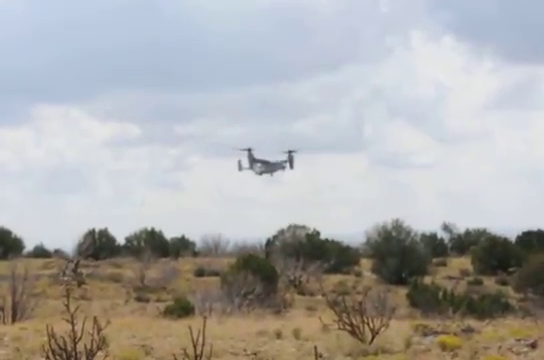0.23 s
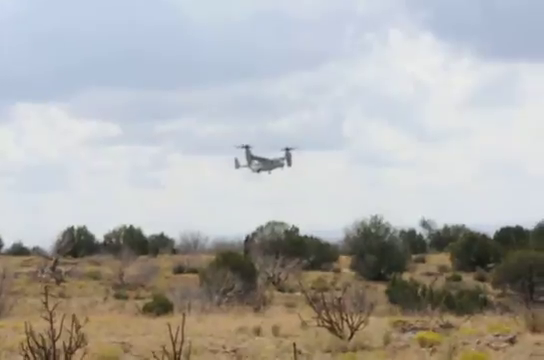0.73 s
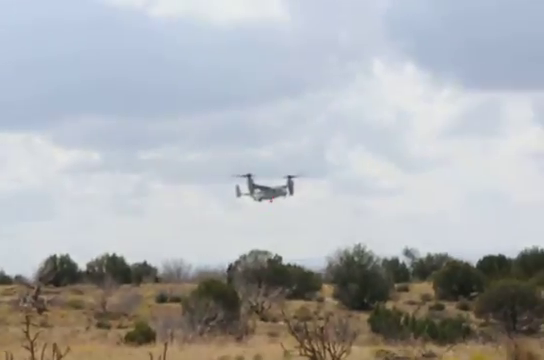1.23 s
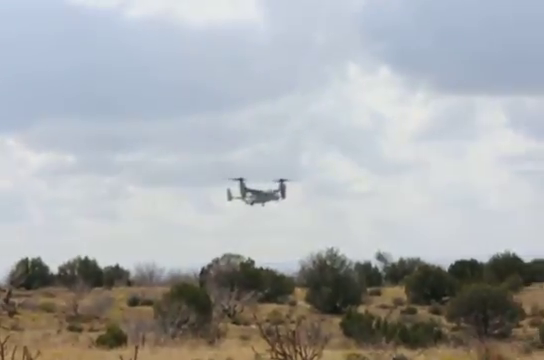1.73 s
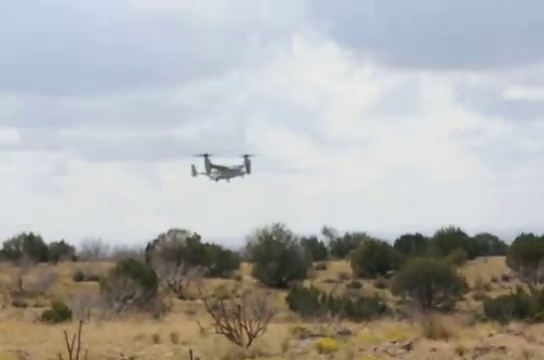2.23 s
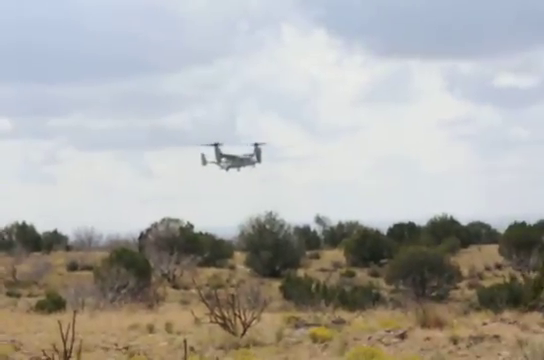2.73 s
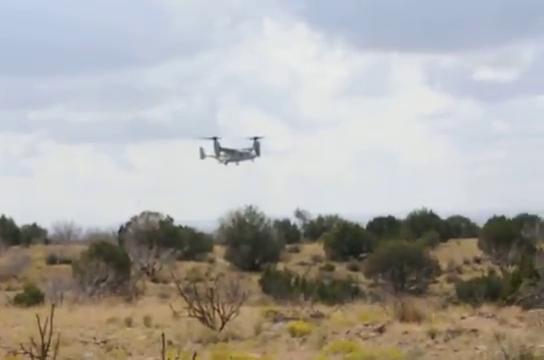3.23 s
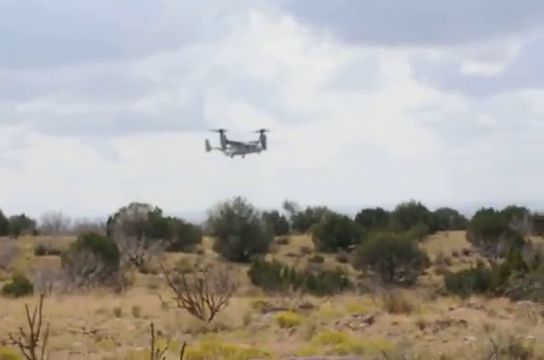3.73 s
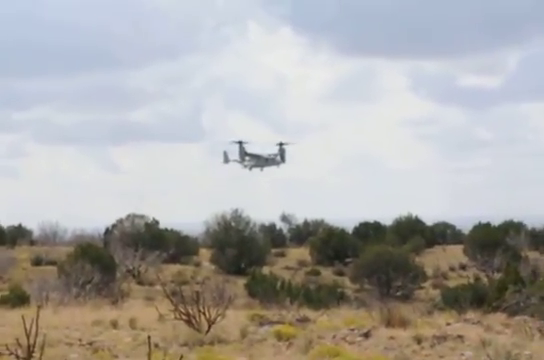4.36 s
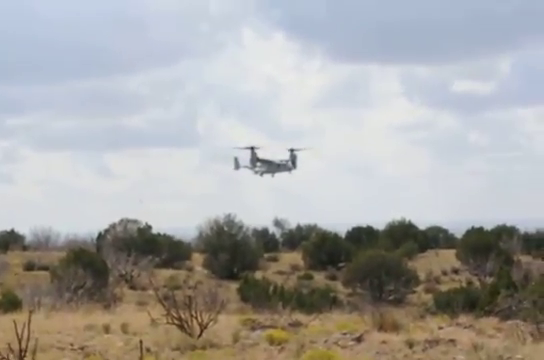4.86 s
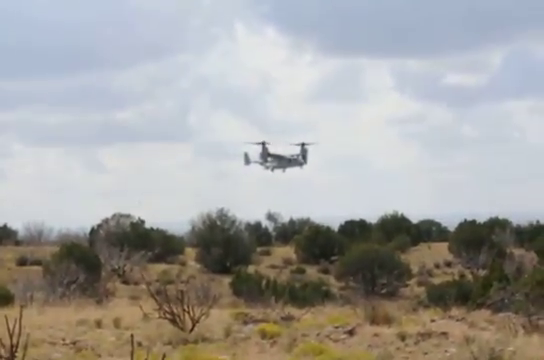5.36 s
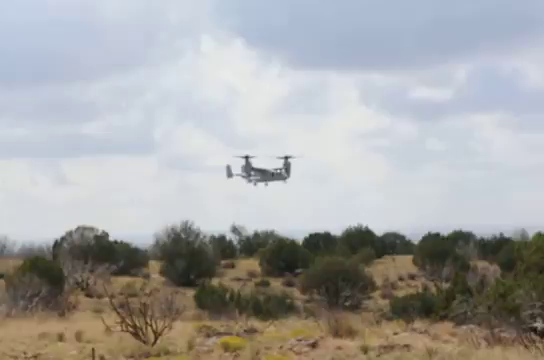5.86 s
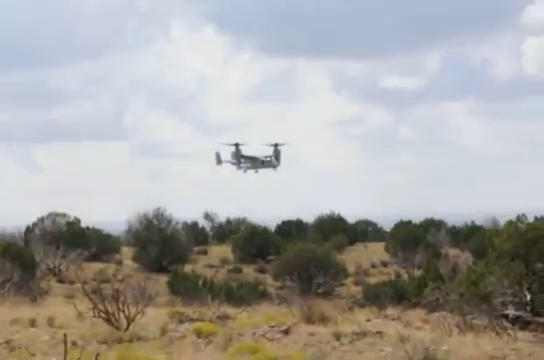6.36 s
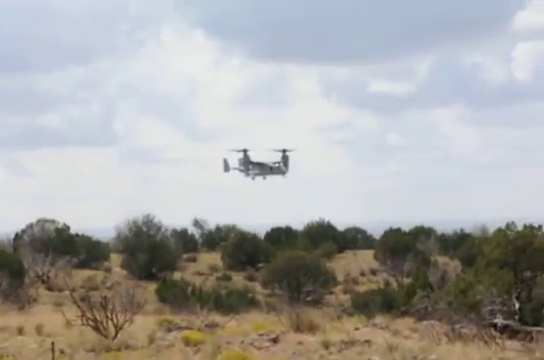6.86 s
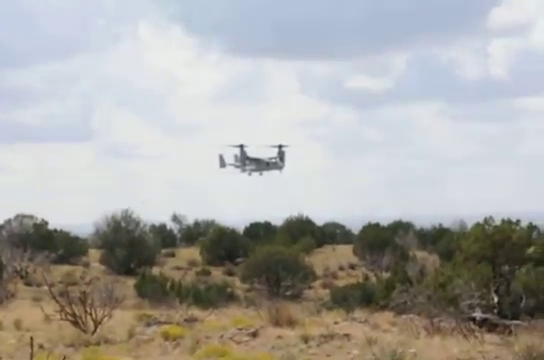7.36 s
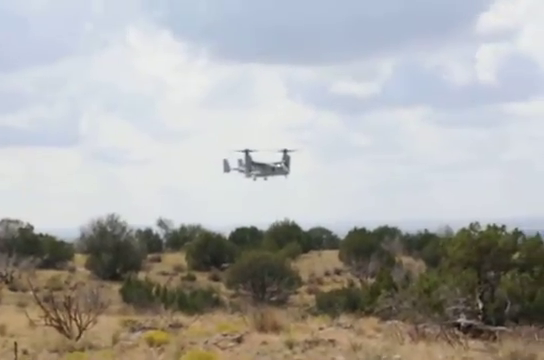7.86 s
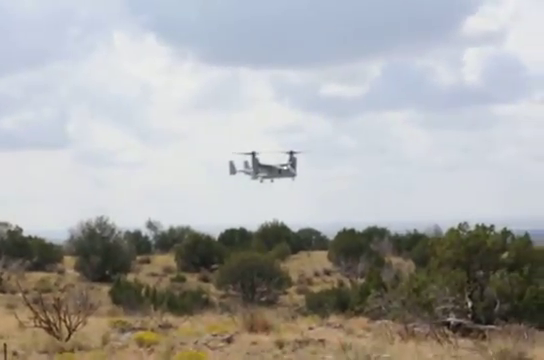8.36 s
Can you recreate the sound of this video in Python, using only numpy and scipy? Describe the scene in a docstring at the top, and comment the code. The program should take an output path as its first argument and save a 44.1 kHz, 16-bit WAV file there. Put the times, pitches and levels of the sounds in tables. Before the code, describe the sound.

Outdoors over open scrubland, a twin-rotor aircraft hovers low. Its blades chop at about twenty-one beats a second without pause, each beat a low thump with a sharp slap. Early slaps crack hard, then soften, and heavy thumps return later. Turbine roar and hiss run beneath. Gusty wind buffets a small microphone, strongest at start and end, and the loudest peaks clip.

```python
"""A twin-rotor aircraft hovers low over scrubland, with one small microphone in gusty wind and rotor wash.
Turbine roar and wind buffeting run throughout; each blade pass sends a suction thump and a sharp vortex slap.
From about 0.6 to 1.9 s the slaps are hard and the thumps weaken; after 2 s the slaps mostly soften.
From about 5 s heavy thumps return, and the wind swells again near the end. Slaps carry knock, crackle and a
scattered tail, some a sliding tone. The input clips the loudest peaks."""
import sys
import numpy as np
from scipy import signal
from scipy.fft import rfft, irfft, next_fast_len
from scipy.io import wavfile
from scipy.ndimage import uniform_filter1d, map_coordinates

SR = 44100
rng = np.random.default_rng(int(sys.argv[2]) if len(sys.argv) > 2 else 0)


def ratio(d):
    """dB to gain"""
    e = np.asarray(d, float) / 20
    return 10 ** e


def dump_mix(stems):
    """Bounce the given channels to the path in sys.argv[1] as a 16-bit WAV at rate SR."""
    frames = np.atleast_2d(stems).T  # one column per channel
    limited = np.clip(frames, -1, 1)  # hard clip at full scale
    pcm = np.round(limited * 32767).astype(np.int16)
    wavfile.write(sys.argv[1], SR, pcm)


N = 379260  # samples, 8.6 s
PASS_S = 0.008  # a pulse level is its rms over this time


def unit(x):
    """Scaled to rms 1."""
    return x / np.sqrt(np.mean(x ** 2) + 1e-20)


def curves(rows, at):
    """Each column after the time, read at the given times."""
    s, *columns = np.transpose(rows)
    return [np.interp(at, s, column) for column in columns]


def wobble(rate):
    """A smooth random curve, rate knots a second."""
    return map_coordinates(rng.standard_normal(N // 64), [np.arange(N) * rate / SR])


def coloured(x, spectrum, causal=False):
    """x through a (f/Hz, dB) spectrum that keeps the power of white noise; causal rings only after a blow."""
    m = 2 * next_fast_len(N // 2 + 4096)
    hz, db = np.transpose(spectrum)
    bins_hz = np.fft.rfftfreq(m, 1 / SR)
    gain = unit(ratio(np.interp(np.log(bins_hz + 1), np.log(hz), db, left=-120, right=-120)))
    if causal:
        # folding the cepstrum gives minimum phase
        cepstrum = irfft(np.log(gain + 1e-3), m)
        cepstrum[1:m // 2] *= 2
        gain = np.exp(rfft(cepstrum[:m // 2], m))
    return irfft(rfft(x, m) * gain, m)[:N]


def rush(spectrum, patchy_db):
    """Turbulent noise of rms 1 whose gain varies in random patches of time and frequency."""
    z = signal.stft(rng.standard_normal(N + 512), nperseg=512)[2]
    field = uniform_filter1d(rng.standard_normal(z.shape), size=5, axis=0)
    field = uniform_filter1d(field, size=10, axis=1)
    patchy = signal.istft(z * ratio(patchy_db * unit(field)), nperseg=512)[1][:N]
    return unit(coloured(patchy, spectrum))


def train(times, db, shape):
    """One pulse shape(ms from its centre) per time, each holding the energy of db over PASS_S."""
    index = np.round(times * SR).astype(int)[:, None] + np.arange(-512, 1024)
    pulses = shape((index / SR - times[:, None]) * 1000)
    energy = np.sum(pulses ** 2, axis=1, keepdims=True)
    pulses = pulses * np.sqrt(PASS_S * SR / energy) * ratio(db)[:, None]
    inside = (index >= 0) & (index < N)
    return np.bincount(index[inside], pulses[inside], N)


def suction(ms, width, shoulder, lean=0):
    """A pressure dip between two small rises; lean lifts the first and lowers the second."""
    u = (ms / width) ** 2
    return (shoulder * u - 1 - lean * ms / width) * np.exp(-u / 2)


def burst(ms, rise, decay, spike, fresh, count=5):
    """A downward spike in fast-dying noise, partly fresh, partly shared among count neighbouring passes."""
    envelope = np.exp(np.minimum(ms / rise, -ms / decay))
    lasting = unit(uniform_filter1d(rng.standard_normal(ms.shape), size=count, axis=0))
    noise = lasting + fresh * rng.standard_normal(ms.shape)
    return envelope * noise - spike * (np.abs(ms) < 0.02)


def eddy_pops(blow_db):
    """Single eddies strike the microphone at random, each a brief pressure dip that grows with the wind."""
    gap, size, wide = rng.random((800, 3)).T
    at = np.cumsum(-np.log(1 - gap)) / 70  # 70 a second on average
    pop_db = -31 + 1.5 * (np.interp(at, np.arange(N) / SR, blow_db) + 33) - 14 * size
    return train(at, pop_db, lambda ms: suction(ms, 0.55 * (0.69 + wide[:, None]), shoulder=0.91))


def wind():
    """Eddies hit the microphone in lumps; the harder it blows, the brighter the buffeting."""
    # steady part of the buffeting at the microphone: t/s, level/dB
    steady = [(0, -28.5), (.7, -40), (1.4, -34), (1.9, -33.5), (2.1, -42.5), (3.1, -40), (3.9, -43),
              (4.6, -34.5), (5.6, -34.5), (6.3, -35), (7.3, -34), (8.1, -32), (8.6, -27.5)]
    # gusts on top of it: t/s, half length/s, extra level/dB
    gusts = [(0.39, 0.16, 11.5), (0.969, 0.16, 10), (1.162, 0.015, 7), (1.667, 0.17, 6), (2.688, 0.043, 7),
             (3.595, 0.11, 7), (4.08, 0.097, 4), (5.02, 0.094, 8), (5.356, 0.044, 11), (5.974, 0.13, 3.5),
             (6.108, 0.044, 11), (6.222, 0.032, 8.5), (6.408, 0.082, 12), (6.573, 0.073, 12),
             (6.679, 0.071, 6.5), (6.88, 0.067, 7), (7.108, 0.021, 13.5), (7.897, 0.088, 6.5),
             (8.311, 0.11, 3)]
    # spectra of low, middle and brightest buffeting: f/Hz, level/dB per Hz
    rumble_spectrum = [(22, -35.5), (65, -6.5), (120, 0), (250, -3), (400, -14), (800, -39)]
    flutter_spectrum = [(120, -24.5), (280, 7), (450, 1.5), (750, -17.5), (1100, -33), (2000, -57.5)]
    rattle_spectrum = [(250, -38), (450, -7.5), (650, -2.5), (900, -10.5), (1300, -16.5), (2000, -49)]
    t = np.arange(N) / SR
    blow_db = curves(steady, t)[0]
    for s, half_s, db in gusts:
        blow_db = blow_db + db * np.exp(-((t - s) / half_s) ** 4)
    # -34 dB at a -33 dB wind, rising as the rotor wash nears
    rumble_db = -34 + 0.84 * (blow_db + 33) + 0.57 * t
    rattle_db = 1.15 * blow_db + 0.5
    lumps, flaps = wobble(45), wobble(120)
    rumble = unit(ratio(1.6 * lumps) * rush(rumble_spectrum, patchy_db=-0.1))
    flutter = unit(ratio(2.0 * lumps + 2.0 * flaps) * rush(flutter_spectrum, patchy_db=1.3))
    rattle = unit(ratio(2.6 * lumps + 4.9 * flaps) * rush(rattle_spectrum, patchy_db=1.5))
    buffeting = ratio(rumble_db) * rumble + ratio(blow_db) * flutter + ratio(rattle_db) * rattle
    return buffeting + eddy_pops(blow_db)


def turbines():
    """Far roar, a narrow ridge in it and hiss: shaped noise, wavering with the air between."""
    # turbines and rotor wash: t/s, level/dB
    roar_level = [(.1, -34), (.44, -30), (.75, -32.5), (1, -32), (1.5, -41), (1.85, -39.5), (2.13, -43),
                  (3, -40), (4, -38.5), (5.4, -36), (6.1, -36), (6.9, -38.5), (7.15, -33.5), (7.35, -31.5),
                  (7.6, -34.5), (7.9, -38), (8.6, -38)]
    # spectra of roar, its narrow ridge and hiss: f/Hz, level/dB per Hz
    roar_spectrum = [(60, 1.5), (200, -1.5), (500, -8), (950, -5.5), (1150, -0.5), (1430, -8), (1620, -2.5),
                     (1850, -19.5), (2500, -42.5)]
    ridge_spectrum = [(1100, -25), (1300, -2), (1420, 0), (1520, -4), (1700, -28)]
    hiss_spectrum = [(1300, -30.5), (1800, -1), (2100, 2.5), (2600, 3.5), (3200, -2.5), (3800, -9),
                     (4400, -18.5), (5000, -28.5)]
    t = np.arange(N) / SR
    roar_db, = curves(roar_level, t)
    ridge_db = roar_db - 3.5 - 0.4 * t  # fades against the roar
    hiss_db = -43.5 + 0.82 * (roar_db + 36.5) + 0.4948 * t
    air = wobble(8.7)
    roar = ratio(roar_db + 0.4 * air) * rush(roar_spectrum, patchy_db=0.5)
    ridge = ratio(ridge_db + 0.71 * air) * unit(coloured(rng.standard_normal(N), ridge_spectrum))
    hiss = ratio(hiss_db + 0.16 * air) * rush(hiss_spectrum, patchy_db=1.0)
    return roar + ridge + hiss


def blade_passes():
    """Times of the passes, where the summed blade rate reaches whole turns; also the opening rate in Hz."""
    # blade passes as they reach the microphone: t/s, f/Hz
    blade_rate = [(0.0, 21.291), (0.614, 21.359), (1.229, 21.29), (1.843, 21.275), (2.457, 21.193),
                  (3.071, 21.189), (3.686, 21.113), (4.3, 21.125), (4.914, 21.022), (5.529, 21.074),
                  (6.143, 21.07), (6.757, 20.95), (7.371, 21.044), (7.986, 21.027), (8.6, 21.096)]
    first_pass_s, opening_hz = 0.0148, blade_rate[0][1]
    t = np.arange(N) / SR
    turns = np.cumsum(curves(blade_rate, t)[0]) / SR
    # whole turns, all set back by the wait for the first pass
    wanted = np.arange(int(turns[-1]) + 1) + first_pass_s * opening_hz
    return np.interp(wanted, turns, t, right=t[-1] + 1), opening_hz


def thumps(times, opening_hz, thump_db, width_ms, heave_db, lean):
    """Blade suction: a broad lift heave, a leaning thump, and a weaker thump between passes."""
    chance = rng.standard_normal((len(times), 2))
    width, lean = width_ms[:, None], lean[:, None]
    heave = train(times - 0.0004, heave_db, lambda ms: suction(ms, 3.07, shoulder=1.0))
    thump = train(times - 0.0003, thump_db + 1.04 * chance[:, 0],
                  lambda ms: suction(ms, width, shoulder=0.74, lean=lean))
    offbeat_db = thump_db - 25.5 + 2.5 * times + 0.74 * chance[:, 1]
    offbeat = train(times + 0.438 / opening_hz, offbeat_db,
                    lambda ms: suction(ms, 2.12, shoulder=0.11))
    return heave + thump + offbeat


def slaps(late, slap_db, lead_ms, far_db):
    """Vortex slaps: the far rotor's dip leads, then the near rotor's and its echo off the ground."""
    chance = rng.standard_normal((len(late), 2))
    echo_ms = 0.58 + 0.16 * chance[:, :1]
    far = ratio(far_db + 3.0 * chance[:, 1])[:, None]

    def crack(ms):
        near = suction(ms, 0.3, shoulder=0.67)
        echo = 0.5 * suction(ms - echo_ms, 0.21, shoulder=0.36)
        return near + echo + far * suction(ms + lead_ms[:, None], 0.42, shoulder=0.39)

    return train(late, slap_db, crack)


def knocks(late, knock_db):
    """The air rings briefly after each slap: a decaying cosine near 1361 Hz, its pitch varying by pass."""
    chance = rng.standard_normal((len(late), 2))
    hz = 1361 * (1 + 0.08 * chance[:, :1])

    def snap(ms):
        return -np.cos(2 * np.pi * hz * (ms - 0.12) / 1000) * np.exp(np.minimum(ms / 0.25, -ms / 1))

    return train(late, knock_db + 1.4 * chance[:, 1], snap)


def crackles(times, late, crackle_db, bright_db, tick_db, tail_db):
    """Noise bursts round each slap: front tick, crackle, sizzle, and a low tail off scrub and ground."""
    # spectra of the four layers: f/Hz, level/dB per Hz
    tick_spectrum = [(3000, -27.5), (3700, 12), (4500, 13.5), (5300, -10), (5900, -25.5), (6300, -22.5)]
    crackle_spectrum = [(1400, -37.5), (1800, 7), (2100, 13), (2500, 10), (3000, -12.5), (3600, -29.5)]
    sizzle_spectrum = [(2000, -29), (2500, 6), (2900, 8.5), (3500, 2.5), (4200, -7.5), (4900, -13.5),
                       (5600, -37.5)]
    tail_spectrum = [(90, -47.5), (180, -13.5), (225, 1), (270, 3.5), (330, -3.5), (450, -10.5), (650, -2),
                     (900, -8), (1300, -47)]
    crackle_db = crackle_db + 1.5 * rng.standard_normal(len(times))
    decay_ms = 1.884 + 0.42 * times[:, None]  # draws out as the aircraft turns

    def spray(ms):
        return burst(ms + 0.65, 0.58, decay_ms, spike=2.35, fresh=0.54)

    tick = train(late, tick_db, lambda ms: burst(ms + 0.91, 0.077, 0.46, spike=0.97, fresh=0.32))
    crackle = train(late, crackle_db - bright_db, spray)
    sizzle = train(late, crackle_db + bright_db, spray)
    tail = train(late, tail_db, lambda ms: burst(ms + 0.63, 1.0, 4.4, spike=0, fresh=0.18, count=14))
    layers = [(tick, tick_spectrum), (crackle, crackle_spectrum),
              (sizzle, sizzle_spectrum), (tail, tail_spectrum)]
    return sum(coloured(x, spectrum, causal=True) for x, spectrum in layers)


def distant_echo(times):
    """A soft echo off the ground further out, arriving later and weaker as time goes on."""
    delay_ms = 7.4 + 0.91 * times
    return train(times + delay_ms / 1000, -31 - 2 * times, lambda ms: suction(ms, 0.74, shoulder=0.45))


def sliding_tones(times, swell_db):
    """Within each run the slaps carry a short decaying tone whose pitch slides from pass to pass."""
    # runs of ringing slaps: start t/s, end t/s, from f/Hz, to f/Hz, level/dB (before the swell over the run)
    runs = [(.42, 0.568, 2230, 2420, -17), (0.45, 0.605, 3180, 3690, -26.5),
            (1.722, 1.964, 2610, 2270, -33.5), (2.157, 2.504, 2280, 1810, -22),
            (2.478, 2.692, 2430, 2060, -27.5), (2.8, 3.01, 2400, 1980, -33.5), (3.09, 3.3, 3570, 3090, -39),
            (4.094, 4.146, 3400, 3270, -31), (4.332, 4.45, 2100, 2210, -34.5),
            (5.55, 5.708, 2440, 2270, -35), (6.93, 7.052, 1136, 1350, -29.5),
            (7.284, 7.36, 2530, 2400, -37.5)]
    out = np.zeros(N)
    for start, end, from_hz, to_hz, db in runs:
        on = (times > start) & (times < end)
        along = (times[on] - start) / (end - start)
        hz = (from_hz + (to_hz - from_hz) * along)[:, None]

        def tone(ms):
            return -np.cos(2 * np.pi * hz * ms / 1000) * np.exp(np.minimum(ms / 0.22, -ms / 2.2))

        out += train(times[on], db + 5 * np.sin(np.pi * along) - 5.5 + swell_db[on], tone)
    return out


def rotors():
    """Every blade pass as heard at the microphone, each a little different in level and arrival."""
    # strength of a pass: t/s, thump level/dB, vortex slap level/dB, sharpness (extra crackle)/dB
    strength = [(0.05, -22.5, -27.5, 1), (0.34, -13.5, -21.5, -3.5), (0.62, -19, -13.5, -4.5),
                (0.95, -29.5, -16, -6.5), (1.3, -41.5, -16, -1), (1.62, -21.5, -17, -3),
                (1.9, -25.5, -17.5, -1.5), (2.05, -23, -36.5, 7), (2.35, -21.5, -27.5, 6),
                (2.75, -22, -25.5, -6.5), (3.1, -26, -27, 2.5), (3.45, -25.5, -22.5, -5),
                (3.75, -23, -26, -6.5), (4.1, -22.5, -21.5, -7.5), (4.55, -20.5, -31, -2),
                (5.0, -17.5, -32, -5.5), (5.4, -18.5, -28.5, -2), (5.6, -18.5, -29, 0), (5.9, -17, -26, -5),
                (6.5, -17.5, -19, -8.5), (6.95, -24.5, -28.5, 1), (7.3, -13, -24.5, 0),
                (7.9, -15.5, -31.5, -6.5), (8.6, -13, -24.5, -6)]
    # as the aircraft turns: t/s, thump width/ms, far rotor's lead/ms, its slap/dB over the near one's
    # (before scatter), lift heave level/dB, thump lean (no unit)
    turning = [(0, 1.53, 3, -3.5, -29, 0.58), (.5, 0.68, 3.23, -13.5, -47, 0.61),
               (1.5, 0.42, 2.15, -11, -52.5, -0.72), (2.6, 0.71, 2.6, -18.5, -26, -0.25),
               (3.4, 1.4, 1, -19.5, -28, -0.39), (4.7, 1.032, 1.2, -22, -29, -0.28),
               (6, 1.12, 2.27, 1.5, -22, -0.04), (7.2, 1.47, 1.77, -2.5, -24.5, 0.61),
               (8.6, 1.56, 1.83, 5, -35, -0.065)]
    # the air between colours the slaps: t/s, front tick level/dB, knock extra/dB, crackle brightness/dB
    colour = [(0, -64, -2.5, 0), (.3, -51.5, -0.5, 2.5), (.6, -43.5, 4, 3.5), (.95, -44, 0, 2),
              (1.3, -47, 5, -2.5), (1.6, -46, -6, 2.5), (1.9, -54, -7.5, 0), (2.1, -65, 6, 1),
              (2.3, -53.5, 2, -2.5), (2.6, -55.5, 0.5, 3), (3, -61, -6.5, -1), (3.45, -43.5, 4, 1),
              (3.75, -58.5, -3, -2), (4.1, -70, 0, 4), (4.55, -69, 6, -6), (5.2, -69.5, -0.5, 1),
              (5.8, -60.5, 7.5, -4.5), (6.33, -53, -1, 0.5), (6.42, -47.5, -1.5, 2),
              (6.68, -42.5, 3.5, -2.5), (6.73, -74, 10, -4), (7.3, -66.5, 2, 0), (7.9, -70, -3, -4.5),
              (8.6, -57, -1.5, -1.5)]
    # passes that stand out, stronger or weaker, the blade meeting a tip vortex squarely or missing it:
    # t/s, change of slap/dB, knock/dB, crackle/dB, tick/dB
    uneven_passes = [(0.437, -3, 2, 2, -1), (0.484, 9, -2, 3.5, 4), (0.531, -6, 3.5, -1.5, 0.5),
                     (0.905, 1, 1, 5, 8.5), (0.953, -4, -7, 4.5, 10.5), (1.0, 1, 6.5, 3, 6),
                     (1.047, -1, -0.5, -5.5, -6), (1.187, 0.5, -1, 0, -12), (1.234, -0.5, 2.5, 5, -3),
                     (1.281, -4.5, 1, 3, 8), (1.328, -3.5, 1.5, 1, -1.5), (1.422, -0.5, 6, -4.5, 10),
                     (1.516, 1, 3.5, 0.5, 5), (1.563, 1.5, -1.5, -2, 1), (1.657, 1.5, 4.5, 2.5, 0),
                     (1.751, -4.5, 0, -1, -2.5), (1.845, 1.5, -6.5, -2, 14), (1.892, -4.5, 3, -2, -1.5),
                     (1.939, 3, -0.5, 4, 4), (1.986, 4.5, 13, 3, 3), (2.033, -10.5, -3, -3.5, -13),
                     (2.174, -13.5, -2, -2.5, -18), (2.221, 7, 6.5, 2.5, 11.5), (2.269, 0, 1.5, 2.5, 14.5),
                     (2.316, -2, -5, 3.5, 6.5), (2.457, 3.5, 3.5, -8.5, -17.5), (2.693, 4, -13, -5.5, -9),
                     (2.74, -3, 0, -9.5, 2), (2.788, -0.5, -5.5, 5, 18), (2.835, 4.5, -12.5, 4, 5),
                     (2.976, 6.5, -1.5, 6, -1.5), (3.023, -3, 5, 3.5, -1), (3.259, -2.5, 4.5, 3, 7),
                     (3.306, 2, 3.5, 1.5, 13), (3.354, 1.5, 2, -5.5, -6), (3.401, 1.5, 2.5, 3.5, 11.5),
                     (3.448, -1.5, 6, 1.5, 0), (3.495, -4, 8.5, 4.5, 1.5), (3.543, 1.5, -1.5, 6, 0.5),
                     (3.59, 1.5, 0, -5.5, -1.5), (3.638, -1, -1.5, -2.5, -3),
                     (3.685, 8.5, 13.5, -5.5, -5.5), (3.733, 2.5, 2.5, -3.5, -4), (3.78, -17, 9, 5.5, -9),
                     (3.827, 4.5, 10.5, 0, -13), (3.875, -3, -2, 6.5, -11), (3.922, 3, 2, -2.5, -9.0),
                     (3.969, -4, 10, 2.5, 16), (4.111, 3.5, 6, 3, 4.5), (4.206, 2.5, 1.5, 4.5, 9),
                     (4.3, 3, -5, -5.5, -3.5), (4.348, 9, 8.5, 7.5, 6.5), (4.442, 5, 0, 9.5, 12),
                     (4.49, 4, -9.5, -5, -10), (4.585, 3, -3, 0.5, -4), (4.68, 14, 3, 4, 4),
                     (4.965, 8.5, 4.5, 9.5, 2.5), (5.012, 9, -6, 6, -1), (5.06, 5.5, 4.5, 0.5, -4.5),
                     (5.25, 7, -9.5, 8.5, 2), (5.345, 5, 0.5, -1, 2), (5.582, 1.5, 5, 7, 8.5),
                     (5.63, -2.5, 2.5, 6.5, 2.5), (5.677, 8, -3, 6, -12.5), (5.819, 1.5, 0.5, 1.5, 15),
                     (6.009, 2, 0, 1.5, 3.5), (6.057, -5, 3.5, 6.5, 1.5), (6.104, -10, -12, -1.5, -1),
                     (6.152, -8, -2, 1, 0), (6.199, -3.5, 6, 6, 15.5), (6.294, 1.5, 4.5, 0.5, -4),
                     (6.342, 1.5, -7, -0.5, -5), (6.389, -2.5, 7, 7, 8.5), (6.437, 0, -2.5, 0, 0),
                     (6.484, -3.5, 6.5, 8, 2.5), (6.58, 6, 1.5, -1, -0.5), (6.628, 1, 0, 2, 7),
                     (6.675, 1, 4.5, -1.5, 1.5), (6.723, 1, -9, -5, -4), (6.772, -1, -6, -3.5, -1),
                     (6.961, 3, 0, 4, 9.5), (7.102, -1, 0, -1.5, -4), (7.197, -2, -5.5, 3, 5),
                     (7.247, -8.5, -0.5, -4, 1), (7.294, -8, 0, 2.5, -3.5), (7.39, 2, -10, -2.5, 6),
                     (7.437, 6, -7.5, -6, 2), (7.485, 8.5, -11, 1, 3.5), (7.532, -5, 0.5, 4, -8),
                     (7.627, 3, 5, 3.5, 14), (7.817, 8.5, 8.5, 3, 4), (8.15, 9.5, 0.5, -4.5, -3),
                     (8.198, 10, -2, -3.5, -5), (8.245, 6, 2, 0.5, -4), (8.483, 1, -10, 4.5, -9),
                     (8.577, 4, 6, -0.5, 11.5)]
    times, opening_hz = blade_passes()
    thump_db, slap_db, sharp_db = curves(strength, times)
    width_ms, lead_ms, far_db, heave_db, lean = curves(turning, times)
    tick_db, knock_extra_db, bright_db = curves(colour, times)
    uneven_s, *changes = np.transpose(uneven_passes)
    nearest = np.abs(times[:, None] - uneven_s).argmin(axis=0)
    uneven_slap, uneven_knock, uneven_crackle, uneven_tick = [
        np.bincount(nearest, db, len(times)) for db in changes]
    # turbulence on the way shifts the sharp parts a little and swells them together
    late = times + 0.0001 * rng.standard_normal(len(times))
    swell = 0.8 * rng.standard_normal(len(times))
    # knock, crackle and tail follow the slap less than dB for dB; the tail also fades as the aircraft turns
    knock_db = -28.5 + 0.92 * (slap_db + 20) + knock_extra_db + uneven_knock + swell
    crackle_db = -31 + 0.75 * (slap_db + 21) + sharp_db + uneven_crackle + swell
    tail_db = -21 + 0.29 * (slap_db + 16.5) - 0.37 * times + 0.56 * swell
    tick_db = tick_db + uneven_tick + swell
    slap_db = slap_db + uneven_slap + 0.14 * uneven_tick + swell
    return (thumps(times, opening_hz, thump_db, width_ms, heave_db, lean)
            + slaps(late, slap_db, lead_ms, far_db)
            + knocks(late, knock_db)
            + crackles(times, late, crackle_db, bright_db, tick_db, tail_db)
            + distant_echo(times)
            + sliding_tones(late, 0.5 * uneven_crackle + swell))


def scene():
    """Wind, turbines and rotors at one microphone."""
    return (wind() + turbines() + rotors())[None]


def low_pass(x):
    """Removes everything above the highest recorded frequency."""
    return signal.sosfilt(signal.butter(12, 16000, fs=SR, output="sos"), x)


def record(dry):
    """The input overloads, a narrow-band path rounds the flat tops, and their overshoot clips into clicks."""
    low_cut = signal.butter(2, 37.3, "high", fs=SR, output="sos")  # Hz
    top_cut = signal.butter(10, 5700, fs=SR, output="sos")  # Hz
    thin = signal.sosfiltfilt(low_cut, dry)
    overloaded = np.clip(thin, -0.77, 0.77)
    narrow = signal.sosfiltfilt(top_cut, overloaded)
    mix = np.clip(narrow, -0.71, 0.71)
    return low_pass(mix)


dry = scene()
out = record(dry)
dump_mix(out)
```